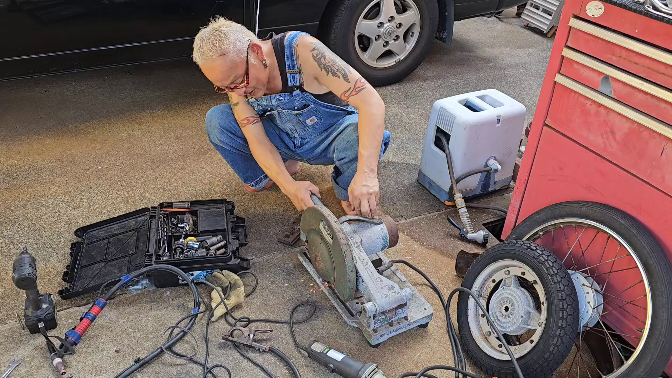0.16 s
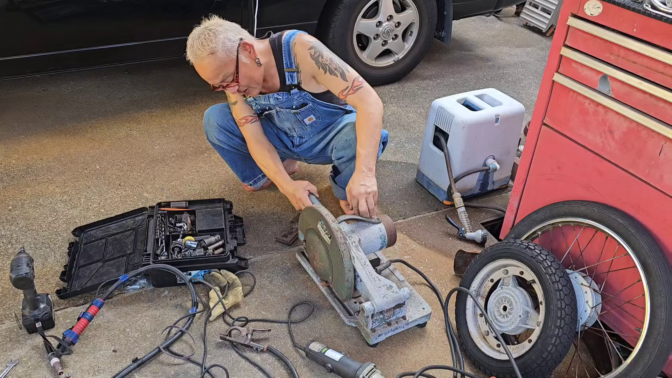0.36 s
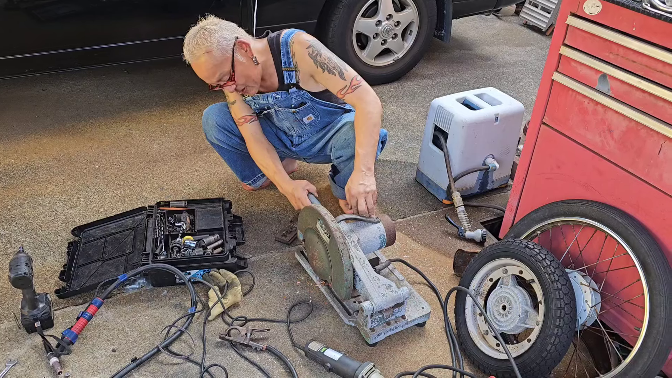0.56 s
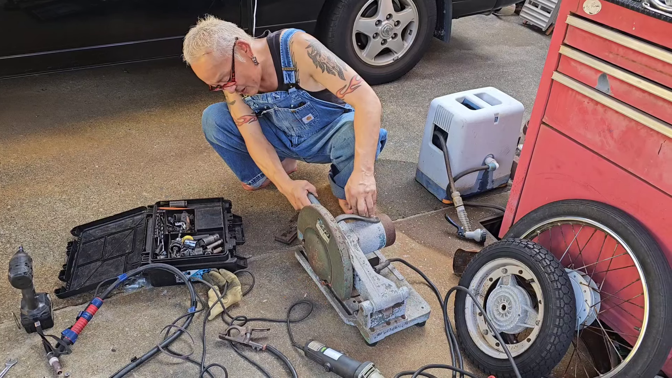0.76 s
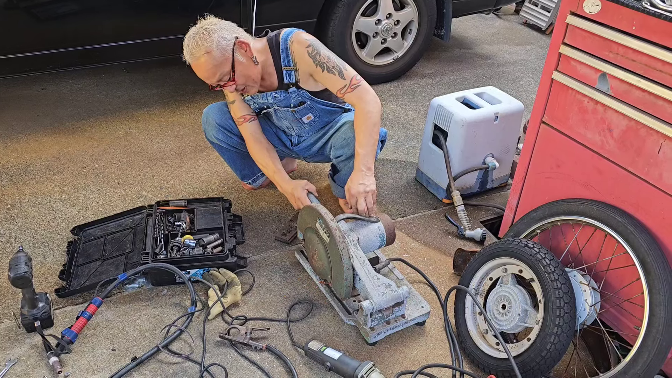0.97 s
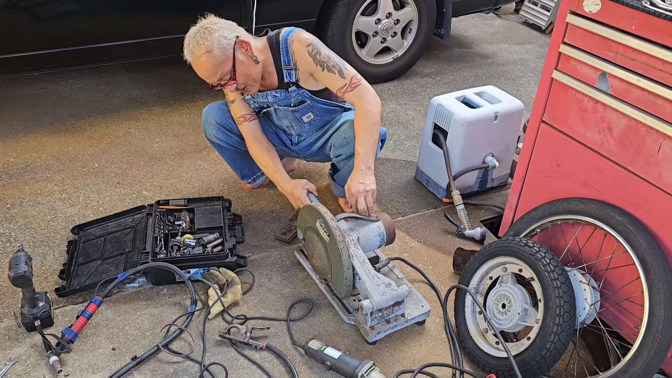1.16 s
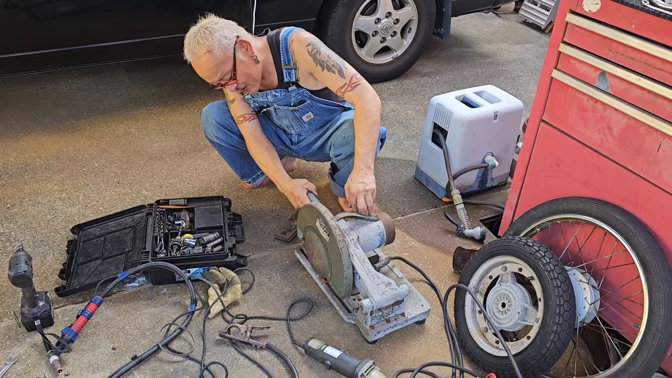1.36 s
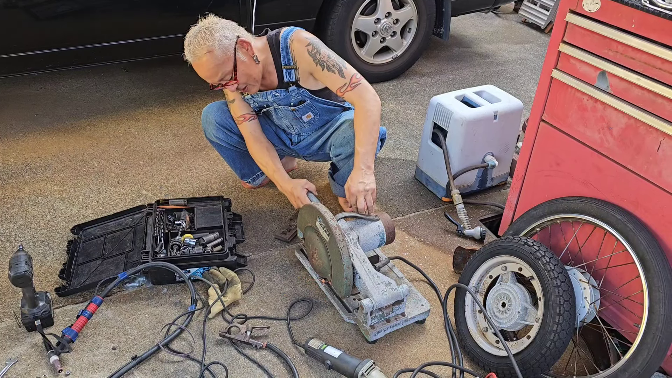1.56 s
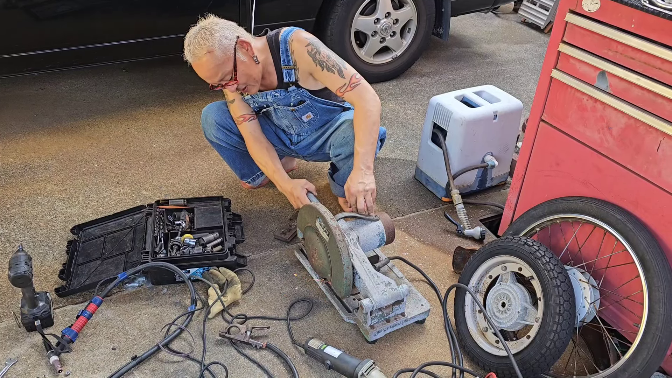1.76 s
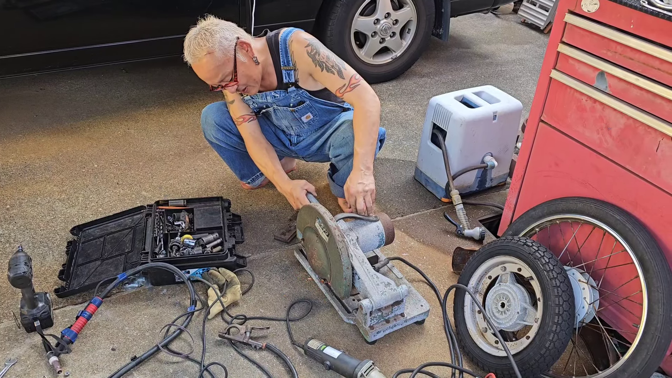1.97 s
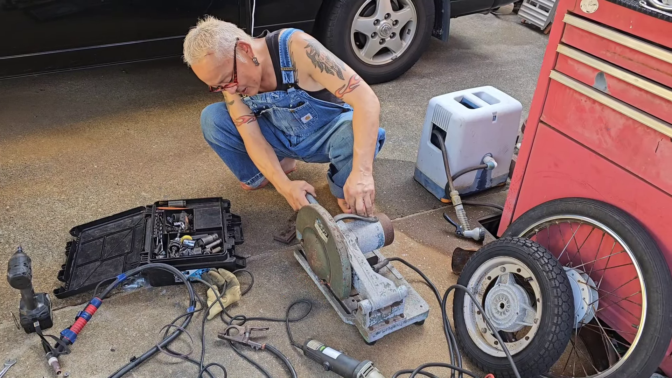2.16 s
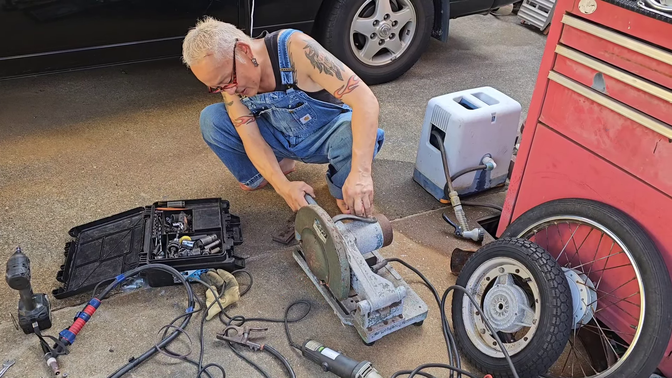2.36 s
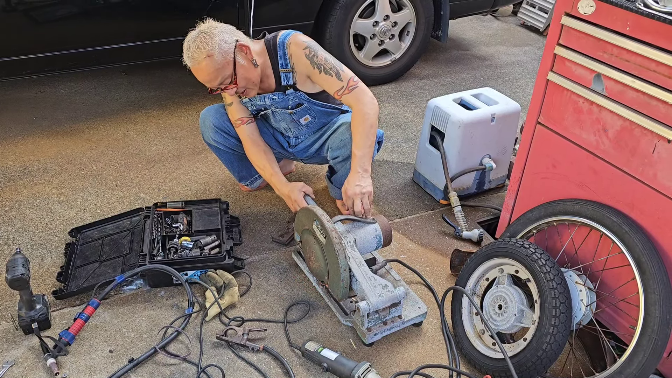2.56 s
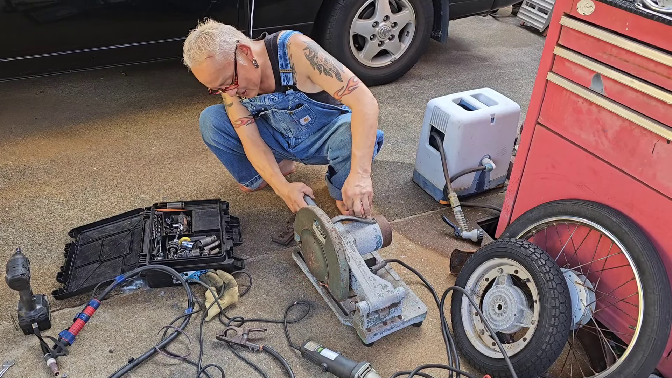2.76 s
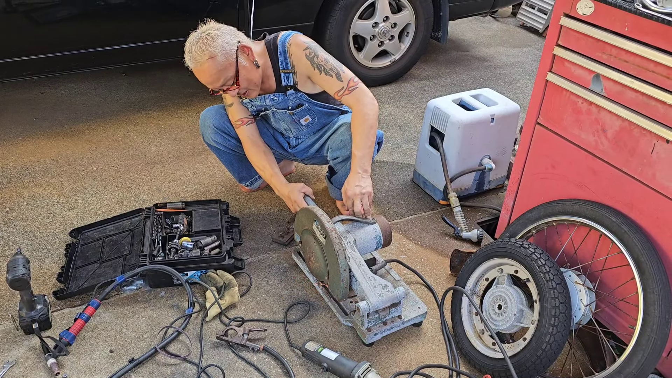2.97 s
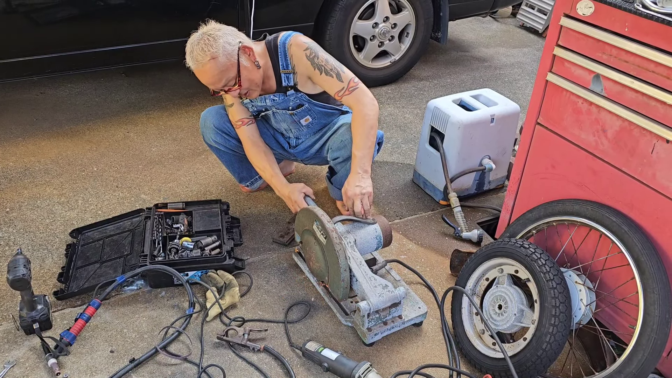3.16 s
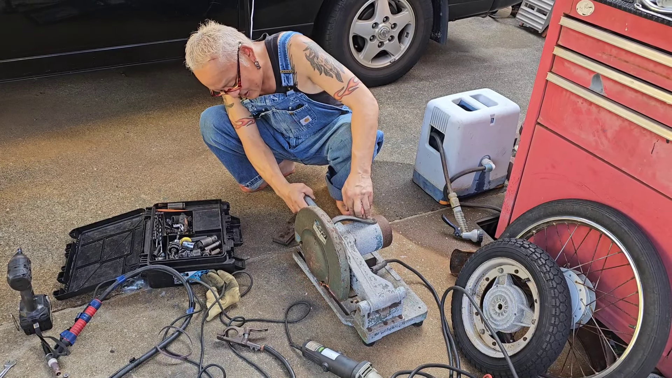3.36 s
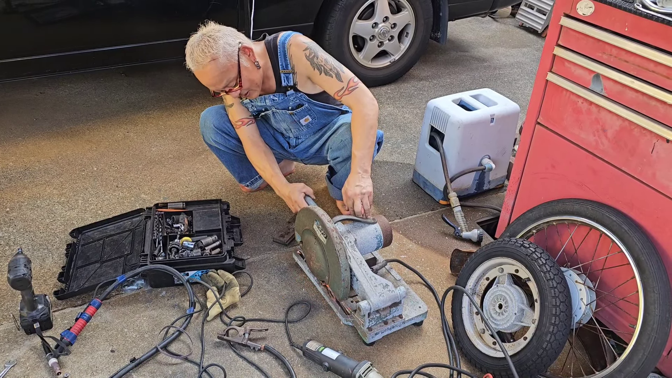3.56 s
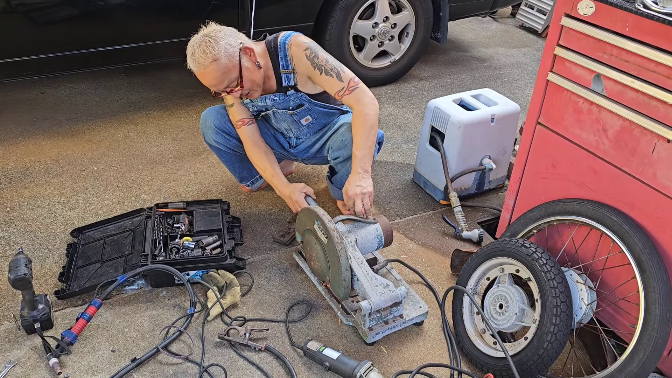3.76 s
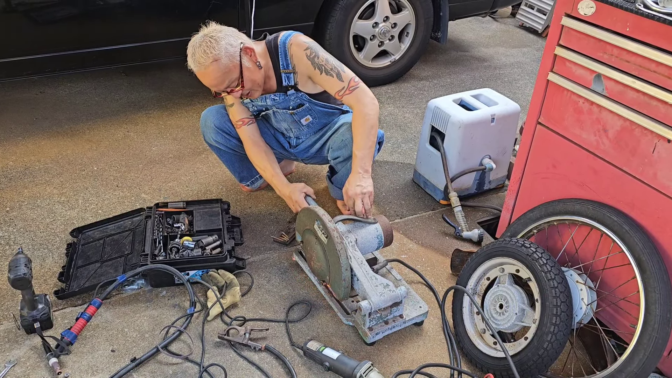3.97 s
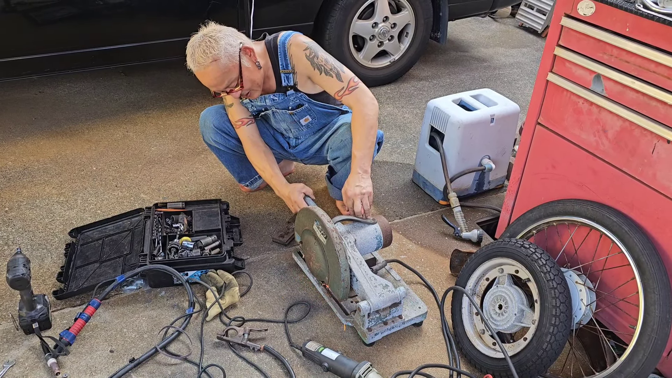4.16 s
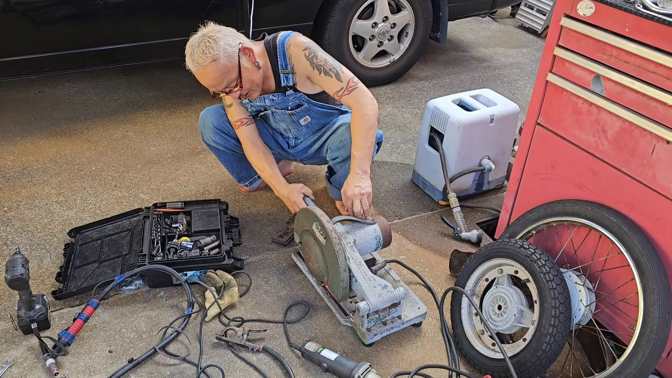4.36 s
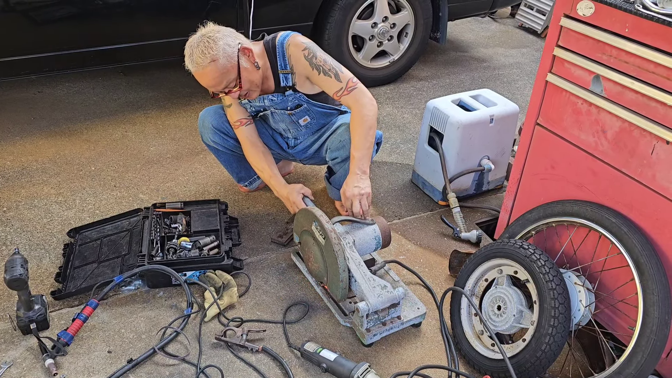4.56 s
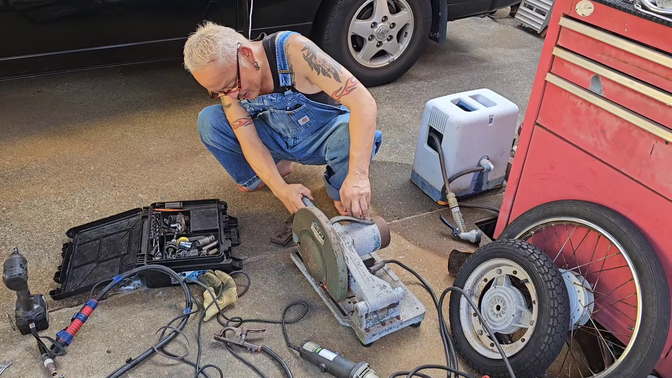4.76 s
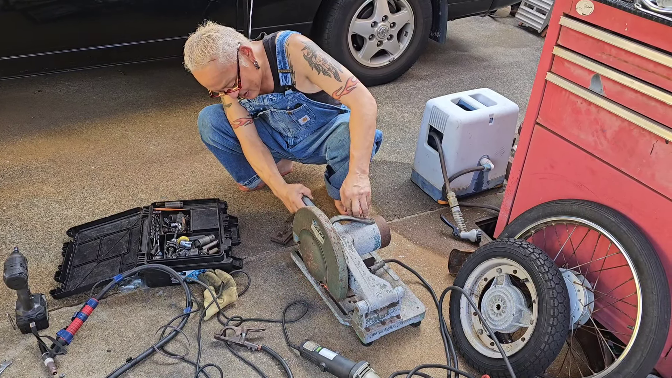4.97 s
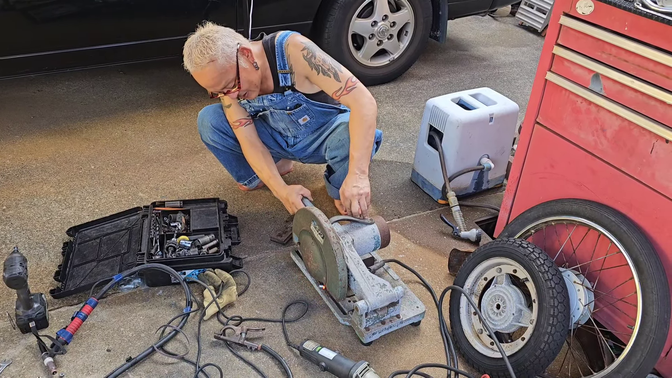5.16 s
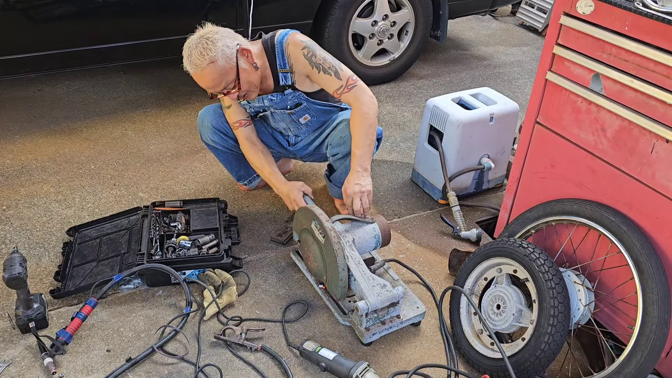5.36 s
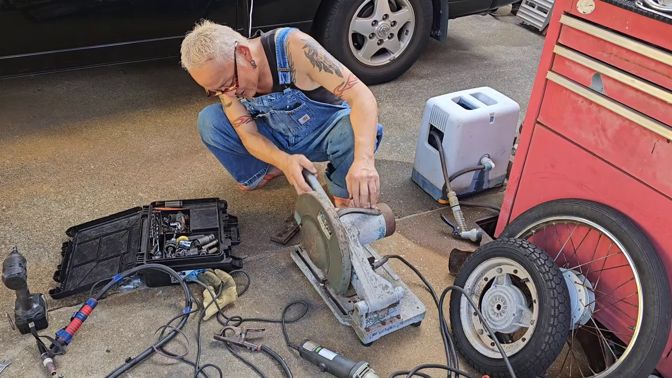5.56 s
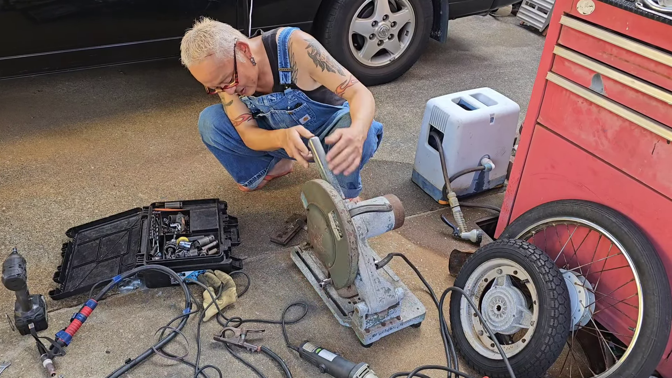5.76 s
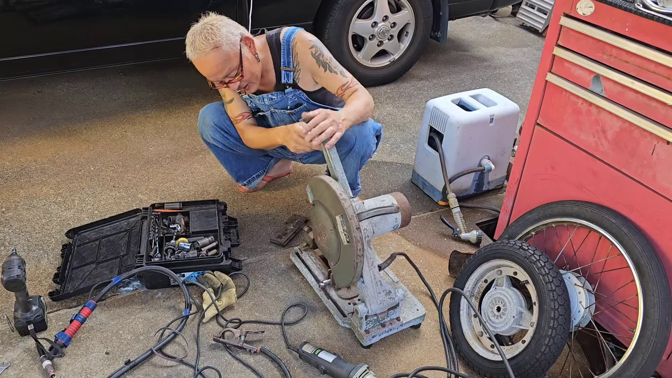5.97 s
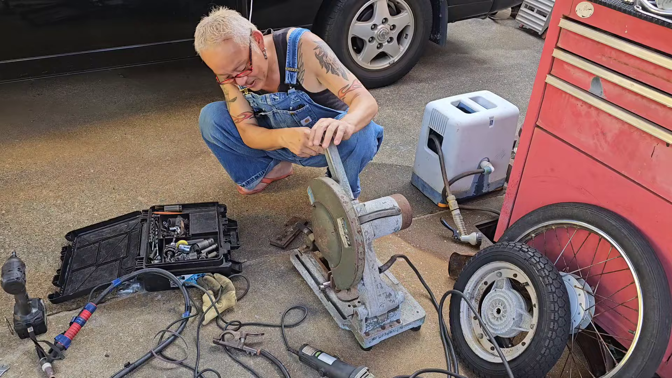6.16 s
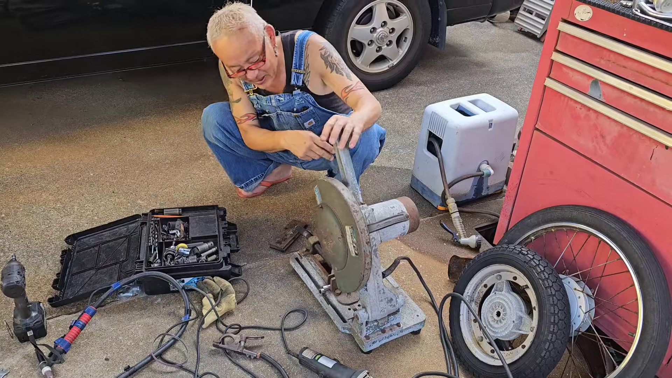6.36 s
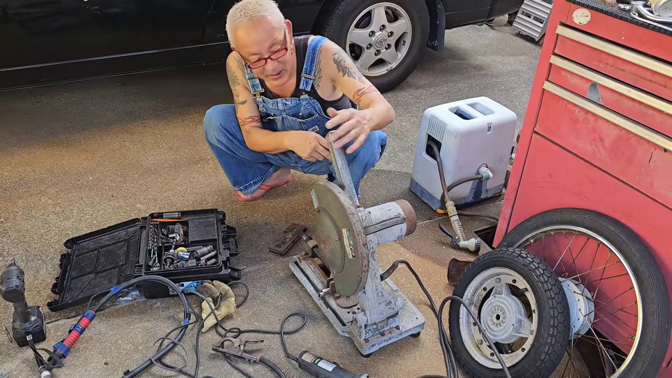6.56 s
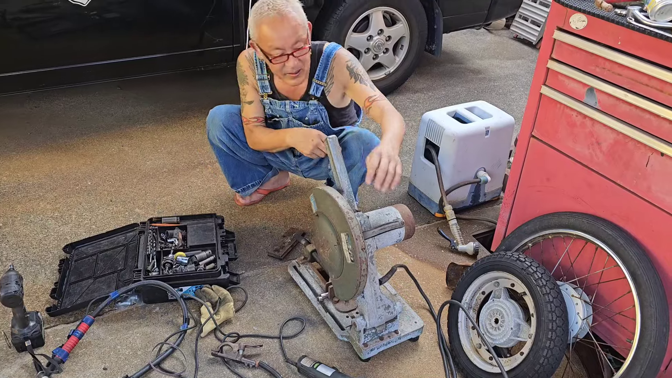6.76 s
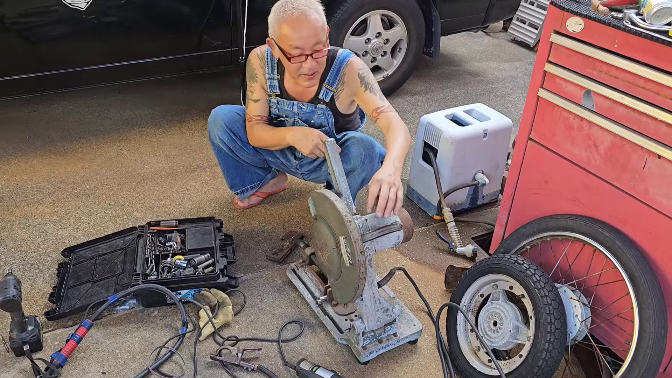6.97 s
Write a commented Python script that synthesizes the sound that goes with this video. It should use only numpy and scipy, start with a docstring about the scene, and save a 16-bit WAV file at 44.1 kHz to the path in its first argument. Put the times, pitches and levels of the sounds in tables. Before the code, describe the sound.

An abrasive chop saw cuts a steel tube in a garage, loud and very close. Its high gear whine wavers under load while the disc rasps, sizzles and briefly squeals, and the tube drones beneath. After about five seconds the pitch climbs and the disc breaks through with a quick metallic chatter. The power stops and the saw coasts on with a slowly falling whir and rushing air.

```python
"""On a garage floor, an abrasive chop saw cuts a steel tube. Its gears whine through a sharp resonance
of their housing and throb with the mains power; the disc rasps and the tube drones. The disc breaks
through with a chatter, the head is lifted and the saw coasts down in a rush of air.
One close microphone picks it up, nearly overloaded."""
import sys
import numpy as np
from scipy import signal
from scipy.fft import rfft
from scipy.io import wavfile
from scipy.ndimage import uniform_filter1d, minimum_filter1d, map_coordinates

SR = 44100
rng = np.random.default_rng(int(sys.argv[2]) if len(sys.argv) > 2 else 0)


def wav_out(sig):
    """Save sig, one row per channel (or a flat mono array), as 16-bit PCM at SR to the path in sys.argv[1]."""
    wavfile.write(sys.argv[1], SR, np.round(np.clip(np.atleast_2d(sig).T, -1, 1) * 32767).astype(np.int16))


N = 308700
T = np.arange(N) / SR
MOTOR_TEETH, WHEEL_TEETH = 7, 61
GEARING = WHEEL_TEETH / MOTOR_TEETH  # motor turns per disc turn
RIPPLE_HZ = 100  # the mains power pushes the motor in pulses


def gears(speed, turns, housing_share=0.71):
    """Meeting teeth whine, and mains pulses add tones on both sides. Each swells at a housing resonance."""
    # how the gear housing resonates: pitch_hz, gain_db
    housing = [(1900, -42), (2250, -12), (2340, -11), (2390, -9), (2432, -2.5), (2475, -15), (2530, -28),
               (2620, -17.5), (2740, -1.5), (2860, -15), (3100, -28)]
    # force on the teeth: time_s, level_db
    tooth_load = [(0, -16.5), (.55, -18), (.78, -10.5), (1, -12.5), (1.25, -7.5), (2.1, -9), (2.75, -9.5),
                  (2.95, -3.5), (3.15, -11), (4.2, -13.5), (4.8, -7), (5.1, -8), (5.33, -14.5)]
    whine, power = 0, 0
    for side, db in zip(range(-2, 3), (-14, -8.5, 3.5, -2.5, -16.5)):
        gain = undb(db) * response(housing, WHEEL_TEETH * speed + side * RIPPLE_HZ)
        # the pulses bend pitch more than level, so the side tones are out of step with the middle one
        cycles = WHEEL_TEETH * turns + side * RIPPLE_HZ * T + 0.15 * abs(side)
        whine += gain * tone(cycles, smear=0.11)
        power += gain ** 2
    whine /= np.sqrt(power) ** (1 - housing_share)  # only a share of each peak reaches the loudness
    return whine * undb(curve(tooth_load) + 1.1 * walk(12)) * fade(5.43, 5.31)


def cut(turns):
    """The disc's rim shakes tube, frame and disc on every turn, while its grains tear the steel."""
    # how hard the tube is shaken: time_s, level_db
    tube_shaking = [(.12, -26), (.3, -19.5), (.8, -21), (1.2, -31), (1.6, -26.5), (1.9, -27.5), (2.15, -21),
                    (2.8, -17.5), (3.6, -24.5), (4.25, -22), (4.8, -26), (5.18, -26), (5.28, -34),
                    (5.52, -30.5)]
    # the disc rings until the slot pinches it, and again as the tube parts: time_s, level_db
    disc_ringing = [(0.1, -17), (.7, -21.5), (1.1, -32), (1.45, -26.5), (2.02, -21), (2.3, -36.5),
                    (4.8, -32), (5.08, -16), (5.3, -16), (5.5, -23)]
    # the disc squeals in the slot: start_s, end_s, level_db
    squeals = [(-.2, .33, -25), (2.3, 2.45, -39), (2.8, 3.05, -36), (4.75, 5.05, -25)]
    # spectra of the tube, frame, disc and squeal: pitch_hz, level_db
    tube_spectrum = [(82, -65), (140, -37), (158, -26), (204, -21), (231, -17), (306, -11.5), (382, -11.5),
                     (436, 1.5), (461, 4), (509, 2), (567, -13.5), (696, -3), (769, -12), (936, -13.5),
                     (1000, -16), (1300, -27), (2200, -120)]
    frame_spectrum = [(560, -40), (950, -18), (1040, -19), (1290, -3), (1380, -1), (1500, -4), (1550, 1),
                      (1620, 5), (1730, -7), (1800, -3), (1960, -0.5), (2150, -4), (2300, -2),
                      (2990, -16.5), (5060, -120)]
    disc_spectrum = [(2450, -15.5), (2600, -2), (2720, 9), (2780, -5), (2845, 12), (2920, 0.5), (3020, -8),
                     (3170, -4.5), (3400, -17)]
    squeal_spectrum = [(4120, -12), (4270, 2), (4400, -21)]
    ripple = np.cos(2 * np.pi * RIPPLE_HZ * T)
    # in the tube's first and last wall the turns are much alike; between them, less so
    repeat = .66 - .26 * fade(2.0, 3.0) + .2 * fade(4.8, 5.08)
    shake = wander(rim(turns, repeat), spread_db=3.5, width_hz=80, span_s=.4)
    drone = undb(curve(tube_shaking) + .5) * colour(rim(turns, 0.57 * repeat), tube_spectrum)
    frame = undb(-14.5 - 0.27 * T) * colour(shake * (1 + 0.05 * ripple), frame_spectrum)
    disc = undb(curve(disc_ringing)) * colour(rim(turns, repeat) * (1 + 0.069 * ripple), disc_spectrum)
    squeal = swells(squeals, edge_s=0.11) * colour(shake, squeal_spectrum)
    grinding = frame + disc + squeal + rings(shake) + grains(turns, ripple)
    contact = undb(-6 * fade(5.28, 5.42))  # the disc touches less and less as the tube parts
    return (drone + grinding * contact) * fade(5.65, 5.51)


def grains(turns, ripple, first_wall_ends_s=2.75):
    """Abrasive grains rasp through the steel; the tube's thin first wall adds a bright sizzle."""
    # the disc grabs and scrapes harder: start_s, end_s, gain_db
    scrapes = [(2.18, 2.34, 6), (5.127, 5.205, 5.5), (5.338, 5.51, 6)]
    # spectra of the rasp and the sizzle: pitch_hz, level_db
    rasp_spectrum = [(1820, -61), (3100, -4.5), (3210, -8.5), (3770, -5.5), (4230, -5), (5100, -6.5),
                     (6160, 1.5), (6720, -2.5), (8060, -6), (10000, -11), (11100, -9), (12500, -13.5),
                     (15500, -15)]
    sizzle_spectrum = [(3410, -37), (5800, -27), (6190, 1), (6430, -3), (6780, -2), (7450, -2.5),
                       (8290, -7), (9540, -6.5), (10400, -12.5), (11000, -3), (11500, -0.5), (12500, -13),
                       (14400, -12.5), (15500, -17)]
    scrape_db = sum(db * swell(start, end, edge_s=0.087) for start, end, db in scrapes)
    rasp = undb(-23.5 + 1.0 * T + scrape_db) * colour(grit(), rasp_spectrum)
    sizzle_db = -14.5 - 1.86 * T - 40 * np.maximum(T - first_wall_ends_s, 0)
    sizzle = undb(sizzle_db) * colour(grit(), sizzle_spectrum)
    bite = undb(0.64 * walk(35) + 0.55 * np.sin(2 * np.pi * turns) + 0.26 * ripple)
    return bite * (rasp + sizzle)


def rings(shake, width_hz=106):
    """The shaking makes single resonances of frame, disc or tube ring out for a moment."""
    # ringing notes: start_s, end_s, pitch_hz, level_db
    notes = [(-.1, 0.327, 2864, -16), (0.583, 0.804, 6330, -24), (.92, 1.13, 1454, -20),
             (1.3, 2.04, 1914, -23), (2.243, 2.633, 1603, -22.5), (2.55, 2.66, 6160, -22),
             (3.05, 3.21, 1505, -20), (4.22, 4.6, 910, -32), (4.954, 5.195, 1616, -19.5),
             (5.283, 5.378, 2880, -17), (5.38, 5.54, 3310, -20), (5.38, 5.52, 5240, -22)]
    return sum(swell(start, end, edge_s=0.045) * undb(db) * unit(resonate(shake, hz, width_hz))
               for start, end, hz, db in notes)


def chatter(scrape_s=0.013, rise_s=0.00072):
    """The disc knocks against the parting tube; each knock is a short scrape that makes it ring."""
    # knocks: time_s, peak_db
    knocks = [(5.2244, -12), (5.2544, -18), (5.2824, -16), (5.3124, -12), (5.3314, 7), (5.3464, -11),
              (5.3567, -5), (5.3744, -3), (5.39, 1), (5.4114, -7), (5.4314, -5), (5.4503, -3.5),
              (5.473, -6), (5.49, -4), (5.5124, -6), (5.5304, -10), (5.547, -9), (5.5672, -13),
              (5.5907, -8), (5.896, -14)]
    # the tube's resonances: pitch_hz, width_hz, level_db
    resonances = [(1920, 300, 2.5), (2850, 220, -19), (3280, 570, -3.5), (5100, 420, -7.5),
                  (6220, 770, -7.5), (8130, 640, -10), (9400, 550, -11), (10770, 790, -13.5),
                  (11800, 760, -14)]
    push = np.zeros(N)
    age = np.arange(SR // 10) / SR
    for time_s, db in knocks:
        start = int((time_s - .002) * SR)
        push[start:start + len(age)] += undb(db) * np.exp(-age / scrape_s) * (1 - np.exp(-age / rise_s))
    ring = sum(undb(db) * resonate(push * noise(), hz, width) for hz, width, db in resonances)
    return undb(7.5 - 6 * fade(5.4, 5.3)) * ring  # the uncut wall still damps the first knocks


def motor(speed, turns):
    """The working motor thuds, hums and sings; the hum and the singing throb with the mains."""
    # the motor's high singing tone: time_s, level_db
    singing = [(0, -51), (2.2, -37), (2.38, -26), (2.6, -48), (2.85, -26), (3.3, -35.5), (4.28, -25),
               (4.45, -31), (5.2, -38)]
    idle_db = -1 + fade(.1, .8)  # a little weaker until the disc has sunk in
    # the thud grows as the disc is dragged down to 38.2 turns a second
    thud = undb(-49.5 + idle_db - 3 * np.maximum(speed - 38.2, 0)) * tone(GEARING / 2 * turns)
    hum = undb(-23.5 + idle_db + 2.0 * walk(4.07)) * tone(4 * GEARING * turns, smear=0.6)
    flutter = 1 + 0.22 * np.sin(2 * np.pi * turns)
    sing = undb(curve(singing)) * flutter * tone(12 * GEARING * turns, smear=.4)
    throb = 1 + 0.6 * np.sin(2 * np.pi * RIPPLE_HZ * T)
    return (thud + (hum + sing) * throb) * fade(5.6, 5.0)


def wobble(turns, gain_db=1):
    """The disc wobbles and booms at multiples of its speed."""
    # booms: start_s, end_s, cycles_per_turn, level_db
    booms = [(.5, 1.0, 8, -39), (1.4, 1.95, 8, -38.5), (1.45, 3.3, 24, -40), (2.05, 2.75, 7, -36),
             (2.15, 3.5, 6, -41), (2.4, 4.0, 8, -40), (4.15, 4.65, 8, -32), (4.2, 4.85, 21.75, -39),
             (4.2, 4.5, 24, -39)]
    sound = 0
    for start, end, per_turn, db in booms:
        gain = swell(start, end, edge_s=.12) * undb(db + gain_db + 2.0 * walk(4.68))
        sound += gain * tone(per_turn * turns, smear=0.21)
    return sound * fade(5.6, 5.0)


def coast(speed, turns):
    """Power off: air rushes round the disc and rings in its guard; fan and gear tones sink."""
    # spectra of the rushing air, the guard and the hiss: pitch_hz, level_db
    rush_spectrum = [(140, -20.5), (250, -19), (420, -8), (600, -3.5), (800, -6.5), (1200, -4), (1450, -5)]
    guard_spectrum = [(1000, -35), (1400, -7.5), (1700, -3), (2000, -7), (2350, -22), (3000, -31)]
    hiss_spectrum = [(1350, -29), (2300, 0.5), (2450, -5), (2680, -2.5), (2760, -1.5), (4910, -6.5),
                     (6090, -8.5), (6810, -6), (7610, -8.5), (8250, -8), (10600, -13), (12900, -15),
                     (15500, -22)]
    # one fan tone flares up: start_s, end_s, level_db
    fan_flares = [(5.9, 6.03, -28), (6.76, 6.84, -21)]
    # the slack gears sing briefly: start_s, end_s, level_db
    gear_sings = [(5.73, 6.04, -29)]
    opened = fade(6.37, 6.91)  # air and fan get louder as the head is lifted
    eddies = wander(noise(), spread_db=2.2, width_hz=120, span_s=.15)
    air = undb(-29 + 6.5 * opened) * colour(noise(), rush_spectrum)
    air += undb(-26 + 8 * opened + 0.76 * walk(9)) * colour(rim(turns, repeat=0.31), guard_spectrum)
    air += undb(-23 + 3 * opened + 1.2 * walk(30)) * colour(eddies, hiss_spectrum)
    fan_per_turn = (40, 5 * GEARING, 44, 48)
    fan_db, open_boost_db = (-24.5, -35.5, -26.5, -29), (2, 15, 11.5, 6)
    fan = 0
    for per_turn, db, boost_db in zip(fan_per_turn, fan_db, open_boost_db):
        gain = undb(db + boost_db * opened + 2.5 * walk(8)) * response(guard_spectrum, per_turn * speed)
        fan += gain * tone(per_turn * turns)
    flare = swells(fan_flares, edge_s=0.017) * tone(44 * turns)
    teeth = swells(gear_sings, edge_s=.13) * undb(1.5 * walk(30)) * tone(WHEEL_TEETH * turns, smear=.5)
    disc_hum = undb(-42.5) * fade(5.5, 6.0) * tone(5 * turns)
    return (air + fan + flare + teeth + disc_hum) * fade(5.45, 5.6)


def garage():
    """The faint, low rumble of the room."""
    # its spectrum: pitch_hz, level_db
    rumble = [(12, -55), (20, -25), (32, -27), (70, -5), (129, -12), (153, -20), (170, 0), (220, -23),
              (370, -120)]
    return undb(-55.5) * colour(noise(), rumble)


def disc_speed(power_off_s=5.39, half_speed_after_s=8.28):
    """Pressing into the tube slows the disc; once the power is off, air drag does."""
    # disc speed under power: time_s, turns_per_s
    powered_speed = [(0, 37.3), (.25, 36.95), (.5, 37.7), (.6, 37.2), (.77, 38.35), (1, 38.97),
                     (1.22, 40.05), (1.48, 40.56), (2, 40.56), (2.28, 40.18), (2.6, 40.44), (2.78, 40.38),
                     (3.23, 38.13), (3.6, 38.42), (3.9, 38.2), (4.28, 38.14), (4.6, 39.42), (4.85, 39.87),
                     (5, 41.2), (5.15, 41.84), (5.3, 44.26), (5.39, 45.37)]
    return curve(powered_speed) / (1 + np.maximum(T - power_off_s, 0) / half_speed_after_s)


def rim(turns, repeat, size=1024):
    """Bumps round the disc: the share `repeat` comes back every turn, the rest is new each time."""
    bumps = np.fft.irfft(np.exp(2j * np.pi * rng.random(size // 2 + 1)))
    same = unit(map_coordinates(bumps, [turns * size % size], order=3, mode="grid-wrap"))
    return np.sqrt(repeat) * same + np.sqrt(1 - repeat) * noise()


def grit():
    """Dense scratches from grains of unequal size, with a shifting tone colour."""
    grain_db = 1.5 * np.repeat(rng.exponential(size=N // 10 + 1), 10)[:N]
    return wander(noise() * undb(grain_db), spread_db=2.8, width_hz=140, span_s=.22)


def wander(x, spread_db, width_hz, span_s, size=1024):
    """Resonances that come and go: each narrow band swells and fades by itself."""
    hz, times, bands = signal.stft(x, SR, nperseg=size)
    places = np.meshgrid(hz / width_hz, times / span_s, indexing="ij")
    drift = map_coordinates(rng.standard_normal((size // 4, size // 4)), places, order=1, mode="mirror")
    return unit(signal.istft(bands * undb(spread_db * drift), SR, nperseg=size)[1][:N])


def resonate(x, hz, width_hz):
    """Pass a sound twice through one resonance."""
    peak = signal.iirpeak(hz, hz / width_hz, SR)
    return signal.lfilter(*peak, signal.lfilter(*peak, x))


def response(spectrum, hz):
    """Gain of a spectrum at any pitch, falling 60 dB an octave beyond its ends."""
    pitches, db = np.transpose(spectrum)
    octave, points = np.log2(np.maximum(hz, 1)), np.log2(pitches)
    outside = np.abs(octave - np.clip(octave, points[0], points[-1]))
    return undb(np.interp(octave, points, db) - 60 * outside)


def colour(x, spectrum):
    """Shape a sound with a spectrum, at strength 1."""
    return unit(np.fft.irfft(rfft(x) * response(spectrum, np.arange(N // 2 + 1) * SR / N), N))


def tone(cycles, smear=0.2):
    """A sine wave of strength 1 whose phase trembles by about `smear` radians."""
    return np.sqrt(2) * np.sin(2 * np.pi * cycles + smear * walk(40))


def walk(rate):
    """A smooth random drift of size about 1, with `rate` new values a second."""
    hold = int(SR / rate)
    steps = np.repeat(rng.standard_normal(N // hold + 1), hold)
    return 1.257 * uniform_filter1d(uniform_filter1d(steps, hold), hold)[:N]


def swells(table, edge_s):
    """Summed gain of swells given as start_s, end_s, level_db."""
    return sum(swell(start, end, edge_s) * undb(db) for start, end, db in table)


def swell(start, end, edge_s):
    """Rise, hold and fall, within 0-1; edge_s is half the rise or fall."""
    return fade(start - edge_s, start + edge_s) * fade(end + edge_s, end - edge_s)


def fade(start, end):
    """0 at the start time, 1 at the end time; with the later time first, it fades out."""
    return np.clip((T - start) / (end - start), 0, 1)


def curve(table):
    """Join rows of time_s, value with straight lines."""
    return np.interp(T, *np.transpose(table))


def noise():
    """White noise."""
    return rng.standard_normal(N)


def unit(x):
    """Scale to an average strength (rms) of 1."""
    return x / np.sqrt(np.mean(x ** 2))


def undb(db):
    """Decibels to gain."""
    return 10 ** (np.asarray(db) / 20)


def limit(x, ceiling_db=1, reaction_s=0.013):
    """Turn the whole sound down around peaks that pass the ceiling."""
    size = int(reaction_s * SR)
    gain = np.minimum(1, undb(ceiling_db) / (np.abs(x) + 1e-9))
    return x * uniform_filter1d(minimum_filter1d(gain, size), size)


def scene():
    """The saw's tones and grinding follow the turning disc; both channels are alike."""
    speed = disc_speed()
    turns = np.cumsum(speed * (1 + 0.00041 * walk(14))) / SR
    drive = gears(speed, turns) + wobble(turns) + motor(speed, turns)
    saw = drive + cut(turns) + chatter() + coast(speed, turns)
    return np.tile(saw + garage(), (2, 1))


def record(dry):
    """The recorder limits and rounds the highest peaks, then cuts the deepest bass and the top."""
    bottom_hz, top_hz = 45, 15700
    held = limit(dry)
    rounded = held / (1 + held ** 20) ** (1 / 20)
    trimmed = signal.sosfilt(signal.butter(2, bottom_hz, "high", fs=SR, output="sos"), rounded)
    return signal.sosfilt(signal.ellip(12, .1, 80, top_hz, fs=SR, output="sos"), trimmed)


dry = scene()
out = record(dry)
wav_out(out)
```